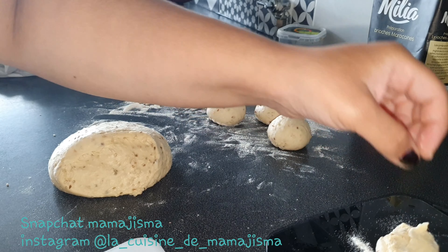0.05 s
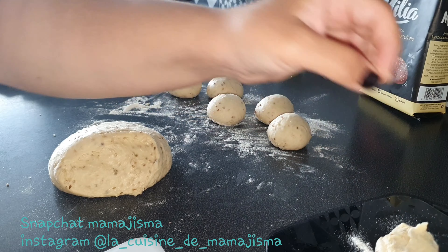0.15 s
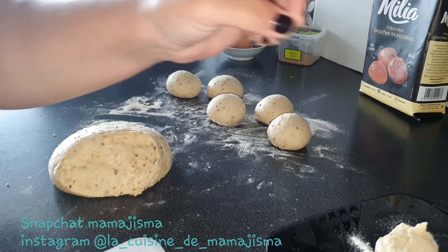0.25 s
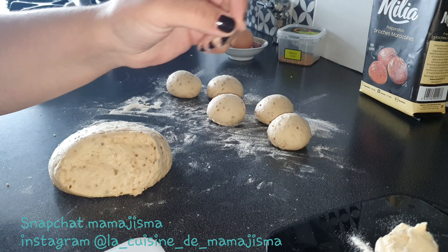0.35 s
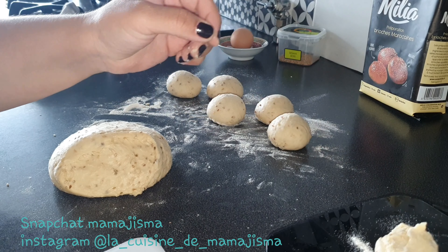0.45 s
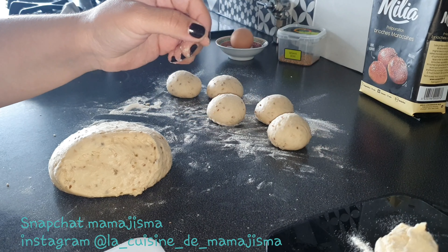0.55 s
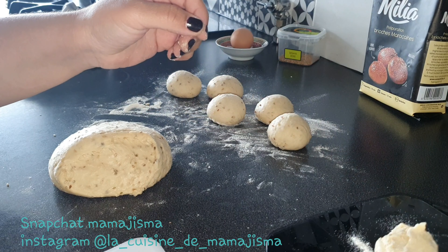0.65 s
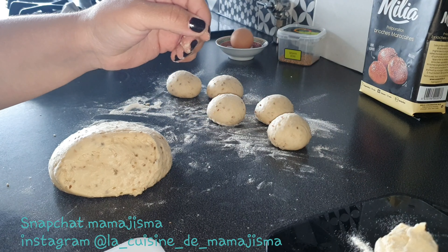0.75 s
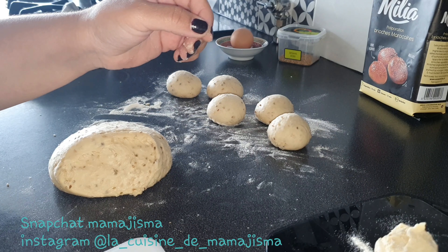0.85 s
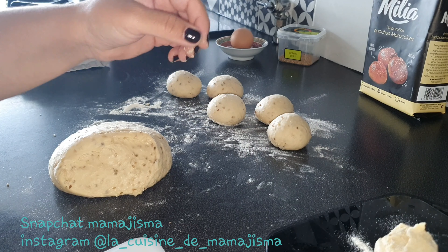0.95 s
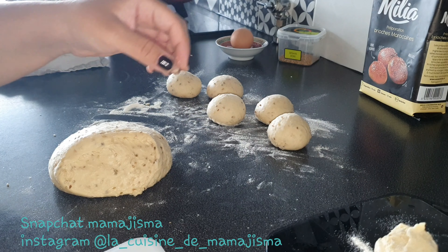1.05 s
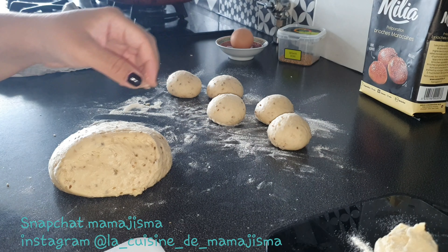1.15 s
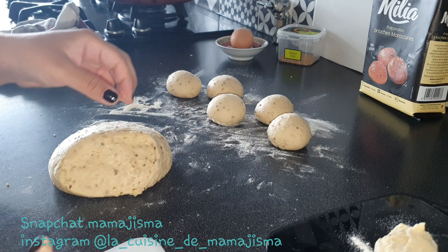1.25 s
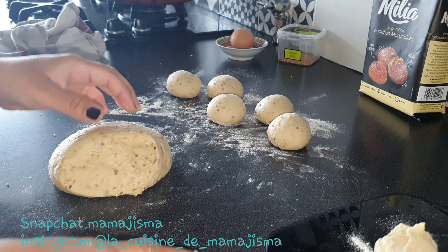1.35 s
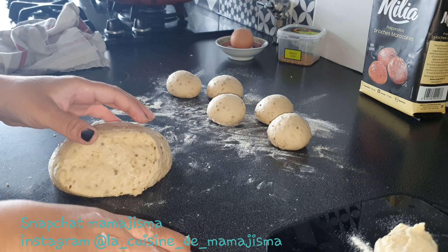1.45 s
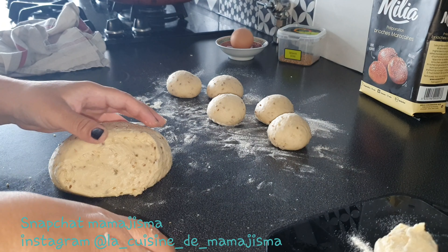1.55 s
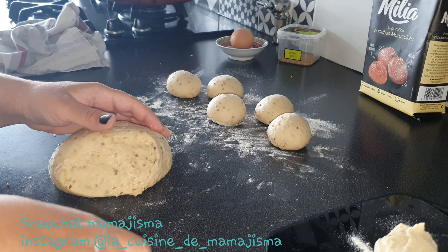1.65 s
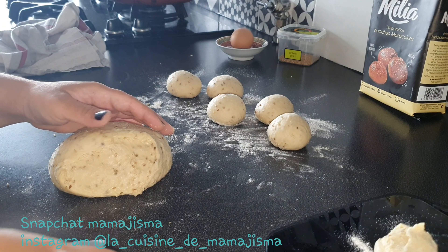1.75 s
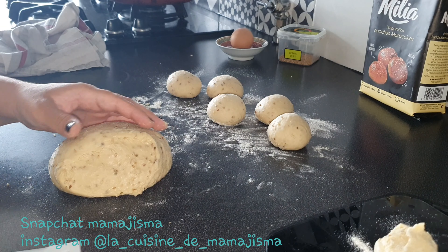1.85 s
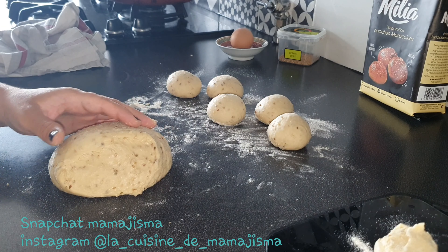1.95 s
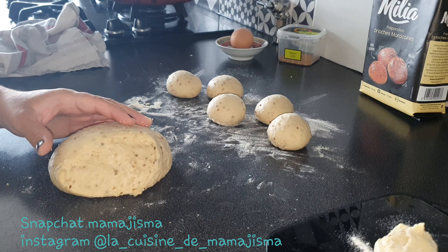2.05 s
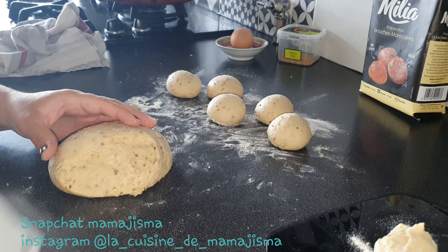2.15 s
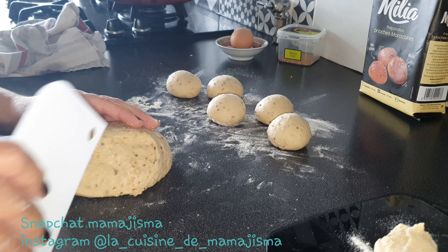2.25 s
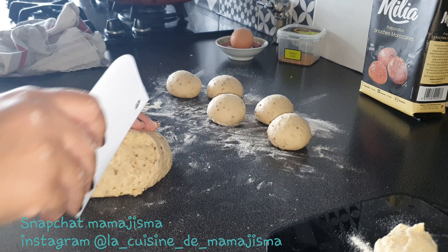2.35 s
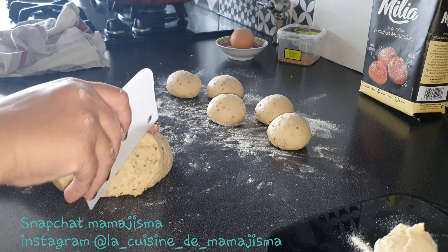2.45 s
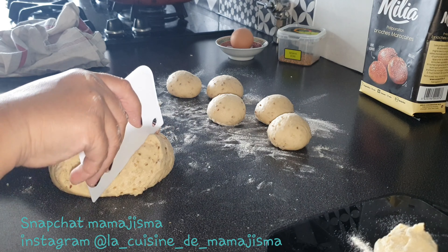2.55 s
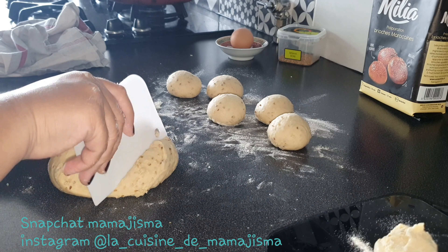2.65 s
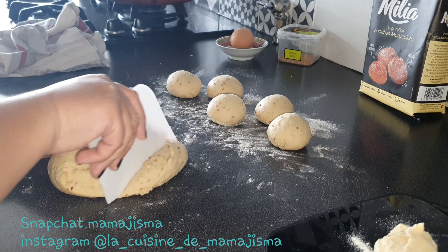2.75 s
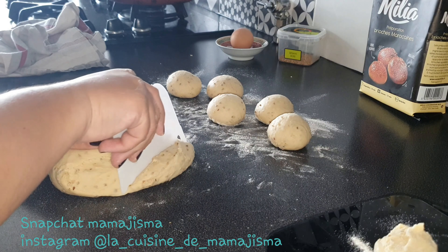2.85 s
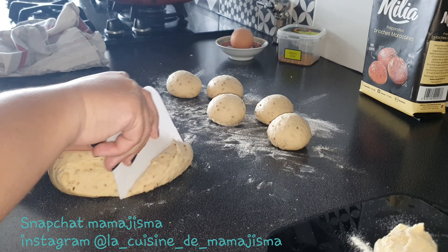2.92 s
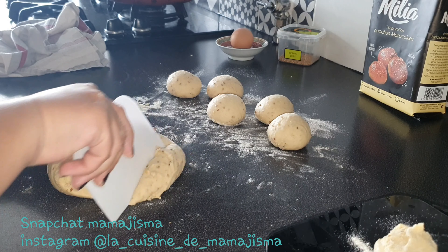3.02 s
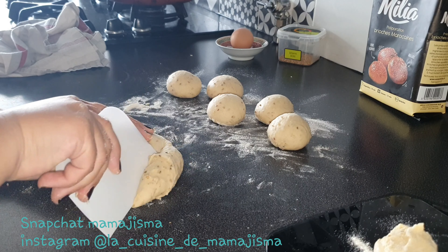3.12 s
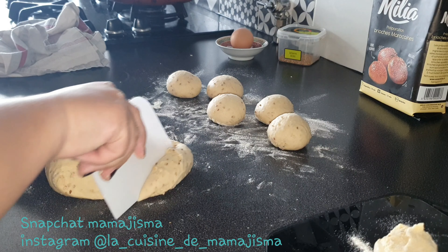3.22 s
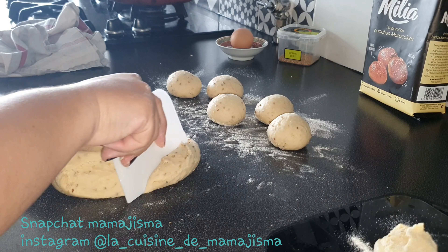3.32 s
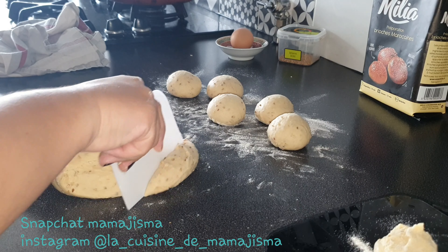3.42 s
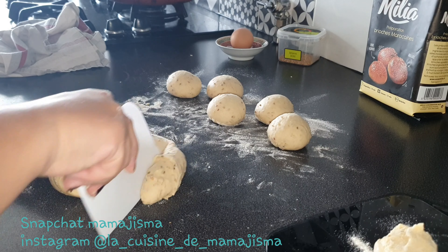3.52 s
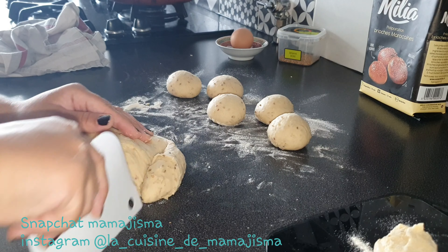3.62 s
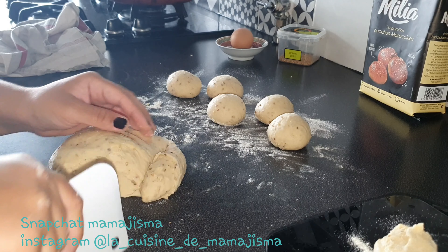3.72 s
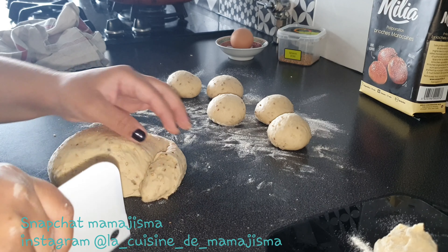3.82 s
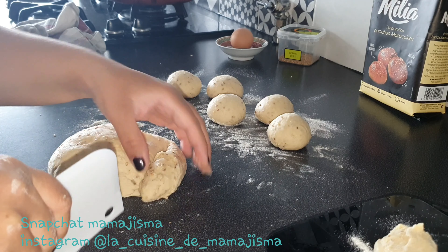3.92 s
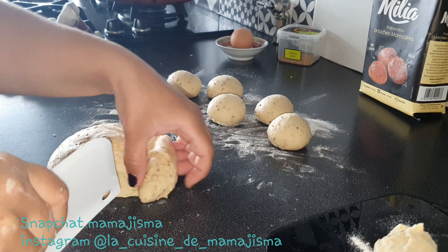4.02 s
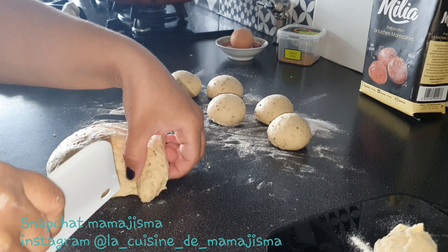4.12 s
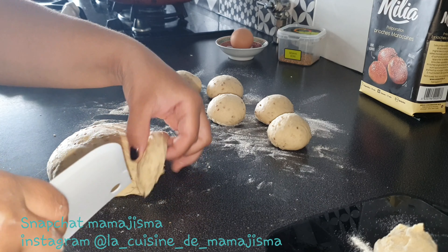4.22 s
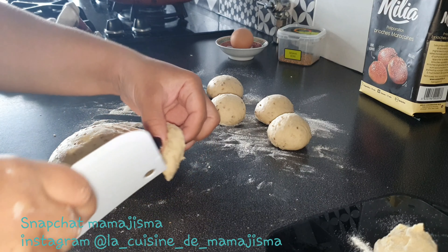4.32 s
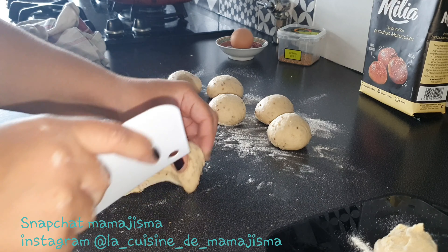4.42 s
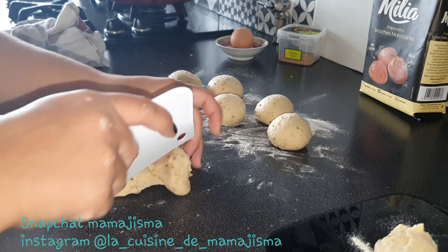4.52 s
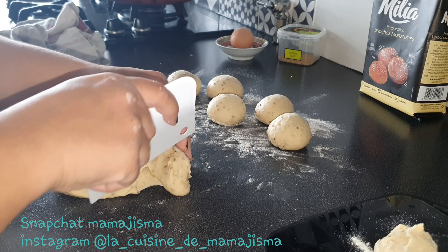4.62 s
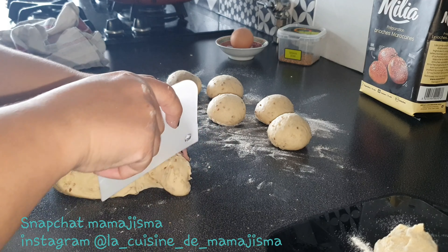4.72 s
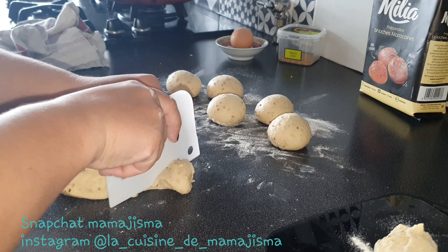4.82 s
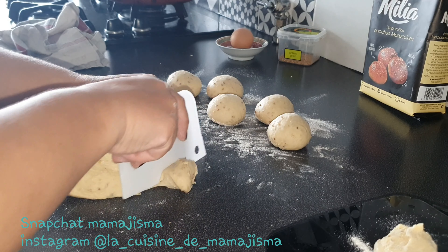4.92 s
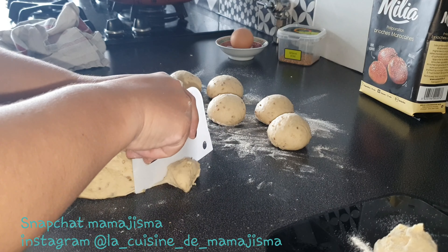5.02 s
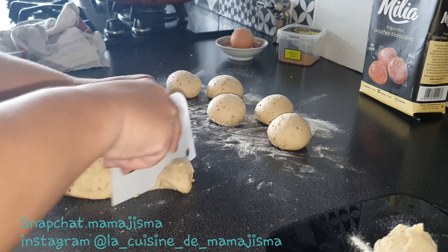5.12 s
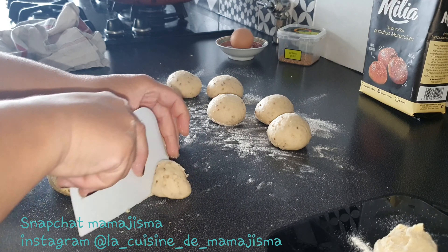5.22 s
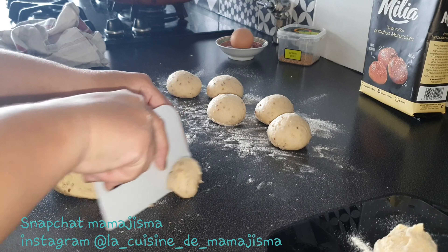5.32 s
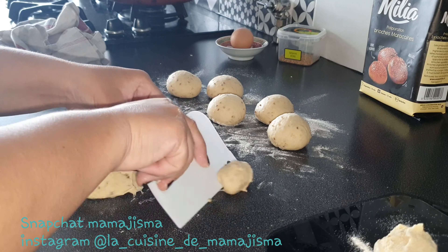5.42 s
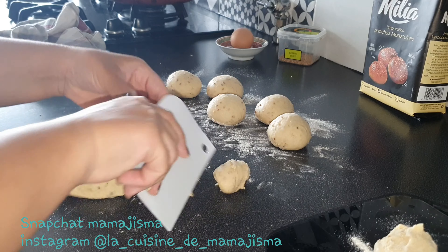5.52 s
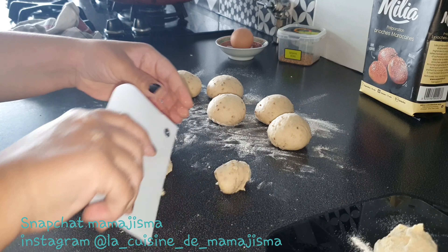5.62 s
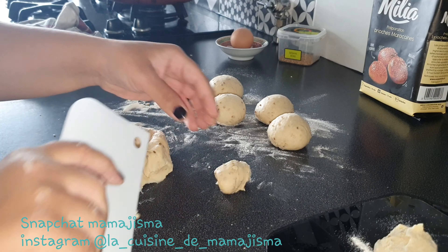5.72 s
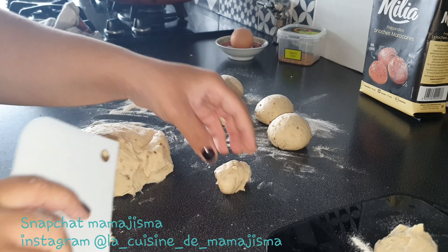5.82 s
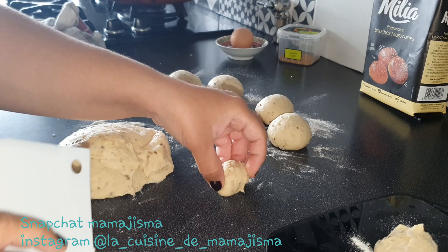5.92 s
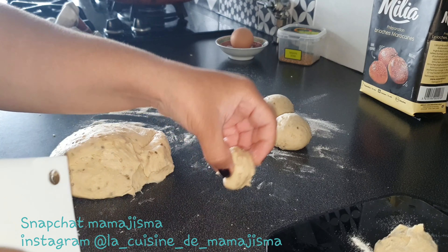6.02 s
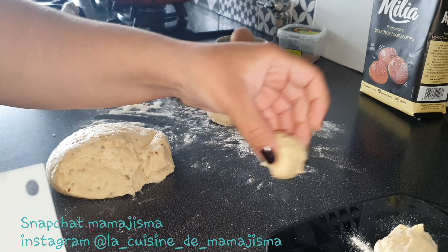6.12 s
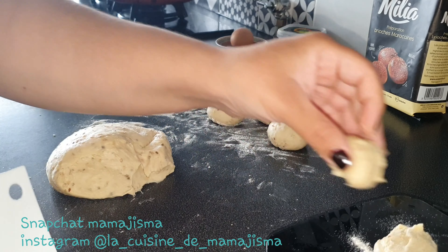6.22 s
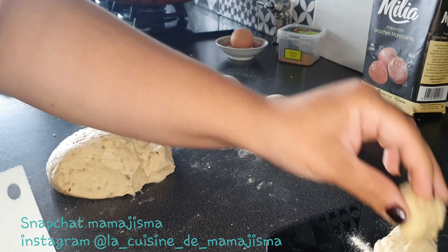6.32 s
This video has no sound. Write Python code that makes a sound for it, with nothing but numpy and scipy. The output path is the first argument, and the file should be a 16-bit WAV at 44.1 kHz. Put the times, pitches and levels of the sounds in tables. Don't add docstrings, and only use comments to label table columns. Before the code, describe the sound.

A close stereo pickup in a small, hard-surfaced kitchen, with action leaning left and a quiet low appliance hum with bassy murmur throughout. From 0 to 1.2 s it is nearly silent: barely audible dry flour hiss between fingertips around 0.25-0.5 s. At 1.35 s a soft dull hand pat, another at 1.47, then a firmer thud with a short gritty rub at 1.68 and a light tick at 1.8. Faint sliding follows near 2.0, with brief bright plastic scuffs at 2.25-2.33. Quiet until 3.1, when the blade drags softly through dough. Ticks gather at 3.6-3.7 into a hollow, sharp clack and scrape at 3.78. A dull, deep thud lands at 4.04, tiny ticks at 4.3. After a lull, a knock at 4.91, then scrapes at 5.19 and 5.26 build to the loudest clack and crisp, bright scrape at 5.42-5.5. Small rubs and ticks fade at 5.65-6.2.

```python
import sys
import numpy as np
from scipy import signal
from scipy.fft import rfft, irfft
from scipy.io import wavfile
from scipy.ndimage import uniform_filter1d, map_coordinates

SR = 44100
rng = np.random.default_rng(int(sys.argv[2]) if len(sys.argv) > 2 else 0)


def natural_amplitude(level_db):
    exponent = np.asarray(level_db, float) / 20
    return 10 ** exponent


def wav_record(signal):
    frames = np.transpose(np.atleast_2d(signal))
    bounded = np.clip(frames, -1, 1)
    quanta = np.round(bounded * 32767).astype(np.int16)
    wavfile.write(sys.argv[1], SR, quanta)


N = 280917
T = np.arange(N) / SR
SWELL = 1.78

# t/s, ring level/dB, edge tick over it/dB, ring f/Hz
CONTACTS = [(0.234, -62, -4, 500), (1.359, -42, -6, 776), (1.466, -53.5, 10, 580), (1.675, -34, 0, 1170),
            (1.807, -48, 4, 463), (2.323, -40, 4, 1040), (3.035, -60, -5, 830), (3.115, -42, -9, 820),
            (3.59, -47, 8, 836), (3.618, -41, 2, 820), (3.688, -29.5, -8, 1080), (3.719, -36, -3, 750),
            (3.784, -19, -14, 757), (3.979, -40, -16, 650), (4.031, -37, -33, 980), (4.287, -54, -3, 950),
            (4.301, -51.5, -2, 690), (4.324, -42.5, -5, 2490), (4.451, -66, -12, 815),
            (4.857, -52, -16, 740), (4.9095, -33, 0.5, 1180), (5.191, -29, -7, 2450),
            (5.2595, -25.5, -5.5, 1570), (5.421, -19, -13, 1220), (5.471, -33, 8, 636),
            (5.49, -31.5, 6, 620), (5.65, -41, 6, 1610), (5.971, -44.5, -3, 890), (6.16, -50, -15, 1080),
            (1.685, -43, -1, 1090), (1.82, -50.5, 5, 900), (3.757, -41.5, 2, 790), (3.819, -33, -21, 825),
            (4.912, -28.5, -25, 1100), (5.016, -56, 3, 1690), (5.133, -53, -5, 690), (5.278, -30, -8, 1410),
            (5.352, -37, -15, 800), (5.401, -36, -5, 1300), (5.427, -25, -10, 1050), (5.451, -39, 0, 1210),
            (5.515, -34, -1, 1010), (5.759, -51, 1, 1100), (5.889, -48, 2, 705), (5.261, -28, -24, 3230),
            (2.242, -41, -7, 2950), (2.262, -43, -3, 1410), (3.3135, -45, 3, 760), (5.414, -27.5, -15, 636)]
# f/Hz, width/Hz, level/dB
SLAB_MODES = [(77.4, 53, 6), (130.7, 16, -1), (225, 30.6, 1), (363.5, 24, -7), (528, 123, -5)]


def sliding(edge_db):
    # f/Hz, width/Hz, level/dB
    edge_modes = [(2860, 680, 5), (3760, 87, -5), (5140, 800, -0.5), (6530, 360, 5.5)]
    # f/Hz, level/dB
    fizz_spectrum = [(4000, -16), (6500, 1), (7500, -4), (9000, -5), (11500, -5), (13500, -6.5),
                     (15000, -10.5), (16000, -19)]
    fizz_lag, sheen_hz, sheen = 0.21, 11200, 0.23
    fizz_db = grip(axis=3) - fizz_lag * (edge_db + 55.5)
    bright_hz = grip(axis=2)
    grit = slips(9000, 2.9, clump_db=1.5)
    coarse = slips(2500, 1.4, clump_db=3.0)
    edge = evened(body(grit, edge_modes)) + 1.72 * evened(resonate(coarse, bright_hz, 2900, order=2))
    fizz = steadied(colour(grit, fizz_spectrum))
    high_pass = signal.butter(2, sheen_hz, "high", fs=SR, output="sos")
    top = signal.sosfiltfilt(high_pass, fizz)
    sheen_gain = natural_amplitude(sheen * (edge_db + 63.5)) - 1
    return natural_amplitude(edge_db) * (steadied(edge) + natural_amplitude(fizz_db) * (fizz + sheen_gain * top))


def pressing(blade_db):
    # f/Hz, width/Hz, level/dB
    blade_modes = [(658, 182, 1.5), (857, 99, -2), (1080, 260, -1), (1387, 126, -1.5), (1620, 210, 1),
                   (2160, 920, 1)]
    base_db, slab_lag = -7, 0.42
    damped = 0.3
    weight_db, bend_hz = grip(axis=4), grip(axis=1)
    slab_db = base_db + weight_db - slab_lag * (blade_db + 62.0)
    drag = slips(1100, 2.34, clump_db=4.5)
    tack = slips(2400, 2.5, clump_db=1.5)
    blade = natural_amplitude(damped * weight_db) * evened(body(drag, blade_modes))
    blade = blade + 0.64 * evened(resonate(tack, bend_hz, 690, order=2))
    slab = natural_amplitude(np.minimum(slab_db, 7.5)) * steadied(body(drag, SLAB_MODES), size=5000)
    return natural_amplitude(1.0 + blade_db) * (steadied(blade) + slab)


def effort(axis):
    # peak t/s, edge scrape level/dB, blade drag level/dB,
    # rise t/s, fall t/s per 20 dB (its sign is ignored)
    handling = [(1.23, -71, -86, 0.09, 2.5), (1.29, -68.5, -72.5, 0.09, 1.9),
                (1.356, -76, -62.5, 0.078, 0.5), (1.51, -64, -63, 0.11, 0.05),
                (1.68, -46.5, -49.5, 0.025, 0.0337), (1.72, -59, -60, 0.024, 0.21),
                (1.81, -53, -63, 0.071, 0.07), (1.85, -60, -63, 0.067, -0.14),
                (1.994, -50.5, -64.5, 0.058, 0.2665), (2.11, -55, -68, 0.17, 0.12),
                (2.18, -55.5, -71, 0.05, 0.2), (2.243, -41, -51, 0.046, 0.0421),
                (2.262, -56, -50, 0.019, 0.0867), (2.33, -41.5, -46.5, 0.027, 0.0157),
                (2.37, -64, -70.5, .04, 0.29), (2.45, -70.5, -74, 0.31, .15), (2.6, -92, -77.5, 0.41, 0.8),
                (2.75, -73, -72, 0.089, 0.16), (2.93, -85, -97, 0.17, .2)]
    first_cut = [(3.052, -61.5, -66, 0.035, 0.54), (3.143, -52, -51.5, 0.14, 0.07),
                 (3.31, -59.5, -54.5, 0.15, 0.08), (3.45, -78, -74.5, 0.16, 2.5),
                 (3.59, -62.5, -61.5, 0.13, 0.07), (3.62, -55.5, -59.5, 0.034, 0.08),
                 (3.69, -51, -49, 0.039, 0.07), (3.722, -45, -44.5, 0.027, 0.123),
                 (3.788, -43, -41.5, 0.026, 0.0757), (3.9, -68.5, -67, 0.22, 0.5),
                 (3.978, -62.5, -51, 0.046, 0.04), (4.049, -64, -54.5, 0.13, 0.06),
                 (4.1, -70, -66.5, 0.12, 0.1), (4.331, -66, -66, 0.084, 0.1), (4.458, -66, -90, 0.04, 0.1),
                 (4.5, -75.5, -88, 0.087, 1), (4.6, -83, -83.5, 0.24, 9.5), (4.78, -78, -87, 0.085, 2)]
    second_cut = [(4.86, -70.5, -72.5, 0.033, 0.6), (4.913, -61.5, -54.5, 0.0033, 0),
                  (4.95, -71, -58, 0.036, 0.25), (5.03, -64.5, -71, 0.24, 0.2),
                  (5.188, -51, -58, 0.078, 0.52), (5.14, -66, -62, 0.045, 0.85),
                  (5.261, -42.5, -43.5, 0.0044, 0.1455), (5.307, -50, -45, 0.094, 0.0851),
                  (5.37, -59, -45.5, 0.034, 0.16), (5.425, -40, -38, 0.09, 0.117),
                  (5.488, -32, -47, 0.16, 0.0655), (5.62, -54, -72, 0.51, 0.1),
                  (5.651, -63, -58.5, 0.017, -0.03), (5.72, -64.5, -87, 0.082, 0.48),
                  (5.771, -57, -60.5, 0.032, 0.24), (5.89, -69, -65.5, 0.14, 0.16),
                  (6.1, -79, -73.5, 0.23, 0.5)]
    return strokes(np.concatenate([handling, first_cut, second_cut])[:, [0, axis, 3, 4]])


def grip(axis):
    holds = [(1.2, 1080, 5000, 0, -17), (1.5, 780, 3600, 1, 4.5), (1.68, 796, 4900, 1.5, 7.5),
             (1.85, 730, 3200, -4.5, 10.5), (2.08, 1340, 3380, -2, 10.5), (2.25, 1450, 2700, -6, -26),
             (2.33, 1350, 4400, -4.5, 0.5), (2.9, 860, 4150, -6.5, -4), (3.1, 844, 3000, -11.5, -6),
             (3.75, 810, 3180, -8.5, 1.5), (4.1, 690, 3580, -10.5, 1.5), (4.45, 1050, 3570, -9, 5),
             (4.65, 770, 4140, 4.5, 1), (4.92, 1160, 2360, -10, 0.5), (5.22, 1420, 3280, -9, 3.5),
             (5.45, 1030, 4500, -4, 2), (5.8, 1390, 2430, -9.5, -7.5), (6.2, 1150, 4270, -2, 2)]
    columns = np.transpose(holds)
    return np.interp(T, columns[0], columns[axis])


def hushed(hush_db=-3.0, before_s=0.0074):
    contact_s = np.sort(np.append(np.transpose(CONTACTS)[0], 99))
    wait_s = contact_s[np.searchsorted(contact_s, T)] - T
    return natural_amplitude(hush_db * np.clip(1 - wait_s / before_s, 0, 1) ** .5)


def singing():
    rubs = [(1.335, -68, 950, 0.081, .04), (1.468, -68, 2920, 0.011, 0.35), (1.808, -51, 3150, .004, 0),
            (1.825, -55, 3340, 0.015, .03), (2.243, -58, 2980, .02, 0.1), (2.26, -52, 1300, .015, 0.05),
            (2.329, -44, 4400, 0.011, -0.0344), (3.725, -53, 3570, 0.0089, 0.22),
            (3.79, -46, 4050, 0.0094, .03), (3.81, -48.5, 858, .012, 0.09), (3.855, -60, 870, 0.011, 0.4),
            (4.93, -54, 2200, .018, .22), (4.93, -55, 920, .015, .2), (5.262, -48, 3200, .004, .03),
            (5.264, -48, 1560, .004, .04), (5.29, -52, 3700, .03, .05), (5.365, -50, 1300, .02, .06),
            (5.425, -42, 700, .025, .03), (5.42, -48, 3000, .03, .05), (5.453, -46, 6300, 0.026, -0.12),
            (5.775, -51.5, 2370, .015, -0.09), (5.78, -63, 1250, 0.021, 0.1),
            (5.77, -63.5, 3770, .012, -0.44), (5.775, -57, 2960, .015, 0.05),
            (5.9, -63.5, 2420, 0.021, 0.18), (5.895, -66, 1340, .015, 0.13), (2.0, -54, 3260, 0.032, -0.05),
            (2.11, -57, 3460, 0.07, -0.17), (3.06, -64, 3100, .03, 0.5), (3.125, -52, 820, .012, 0.16),
            (3.28, -58.5, 890, 0.041, -0.1), (3.312, -55, 780, 0.014, -0.02),
            (4.325, -68, 2450, 0.016, 0.18), (4.36, -65, 3800, 0.019, .03), (4.457, -60, 3560, .018, 0),
            (4.72, -75.5, 904, .03, 0.05), (4.56, -78, 2800, .04, .06), (5.272, -47.5, 3060, 0.0091, -0.2)]
    sharpness = 6.0
    out, t = np.zeros(N), np.arange(16000) / SR
    for s, db, hz, rise, fall in rubs:
        rise, fall = abs(rise), abs(fall)
        jerks = rng.standard_normal(len(t))
        since = t - rise
        decay = natural_amplitude(-20 * np.maximum(since, 0) / fall)
        shape = np.where(since < 0, (t / rise) ** SWELL, decay)
        add(out, s - rise, natural_amplitude(db) * shape * evened(resonate(jerks, hz, hz / sharpness, order=2)))
    return out


def taps():
    ring_s, shortens_by = 0.03, 0.85
    out, t, bright_hz = np.zeros(N), np.arange(3000) / SR, grip(axis=2)
    for s, db, tick_db, hz in CONTACTS:
        a, b = rng.standard_normal((2, len(t)))
        t60, tick_hz = ring_s * (800 / hz) ** shortens_by, bright_hz[round(s * SR)]
        ring = np.sin(2 * np.pi * hz * t) + 0.5 * evened(resonate(a, hz, 470))
        ring = ring * natural_amplitude(-60 * t / t60)
        tick = evened(resonate(resonate(b, tick_hz, 2800), tick_hz, 2800))
        tick = tick * natural_amplitude(tick_db + 4.5 - 60 * t / 0.0094)
        onset = np.minimum(t / 0.00045, 1)
        add(out, s, natural_amplitude(db - 5.0) * (ring + 0.87 * tick) * onset)
    return out


def thuds():
    # t/s, level/dB, knock f/Hz, knock share 0-1, t60/s
    blows = [(1.344, -36, 220, 0.9, 0.2), (1.357, -31, 370, 0.56, 0.45), (1.466, -36, 138, 0.8, 0.34),
             (1.663, -32, 286, 0.02, 0.21), (1.676, -30.5, 224, 0.3, 0.36), (1.801, -37.5, 353, 0.25, 0.14),
             (1.998, -59, 152, 0.7, 0.13), (3.113, -54, 150, 0.2, 0.18), (3.785, -31, 510, 0.64, 0.17),
             (4.037, -25, 353, 0.46, 0.24), (4.048, -28, 155, 0.4, 0.17), (4.298, -46, 155, 1, 0.26),
             (4.903, -37.5, 154, 0, 0.63), (5.416, -26, 518, 1, 0.099), (5.965, -43, 263, 0.06, 0.15)]
    out, t = np.zeros(N), np.arange(8000) / SR
    for s, db, hz, share, t60 in blows:
        push = rng.standard_normal(len(t)) * natural_amplitude(-60 * t / 0.0088)
        boom = body(push, SLAB_MODES)
        knock = np.sin(2 * np.pi * hz * t) * natural_amplitude(-60 * t / .05) * np.minimum(t / .002, 1)
        decay = natural_amplitude(db - 5.5 - 60 * t / max(t60, .03))
        add(out, s, decay * (share * knock + (1 - share) * boom / abs(boom).max()))
    return out


def pinch():
    rubs = [
        (0.246, -84, .05, .4),
        (0.39, -79, .2, .3),
        (0.51, -81, .2, .12),
        (1.13, -84, .1, .1),
    ]
    # f/Hz, level/dB
    hiss_spectrum = [(1500, -35), (2500, -10), (4200, -7), (5600, -2.5), (6800, -1), (8000, -11),
                     (11500, -12), (16000, -23)]
    return natural_amplitude(strokes(rubs)) * evened(colour(slips(12000, 1.5, clump_db=-1.0), hiss_spectrum))


def cabinet():
    modes_hz = [46.0, 81.8]
    shoves = [(0.95, -58.5, -75), (1.5, -57, -63), (1.72, -56.5, -47.5), (3.15, -99, -57),
              (3.76, -58, -57.5), (4.07, -62, -50.5), (4.241, -55, -57), (4.76, -75, -89), (4.94, -62, -62),
              (5.18, -53.5, -79), (5.41, -51, -63), (5.92, -54.5, -55.5)]
    rest_db, rise_s, fall_s = [-69, -70], [0.2, 0.1], [0.16, 0.26]
    out = np.zeros(N)
    for k, hz in enumerate(modes_hz):
        sway_db = strokes([(row[0], row[1 + k], rise_s[k], fall_s[k]) for row in shoves])
        murmur = evened(resonate(rng.standard_normal(N), hz, 2.8))
        out += tone(hz, sway_db, 1.3) + natural_amplitude(rest_db[k]) * murmur
    return out


def appliance():
    # level/dB, left-right/dB
    orders_db = [(-61, -1.5), (-64.5, -5), (-83, -13.5)]
    # f/Hz, level/dB
    whine_lines = [(200, -89), (138, -78)]
    shaft_hz, mains_hz, mains_db = 49.21, 99.93, -68
    late_db, build_s = 7, 2.8
    builds_db = (0, 0, late_db * (np.minimum(T / build_s, 1) - 1))
    out = tone(mains_hz, mains_db, 0.36) + np.zeros((2, 1))
    for order, more_db, (db, pan_db) in zip((1, 2, 8.001), builds_db, orders_db):
        sides = natural_amplitude(np.array([[pan_db], [-pan_db]]) / 2)
        out = out + tone(order * shaft_hz, db + more_db, 0.8) * sides
    return out + sum(tone(hz, db, 2.5) for hz, db in whine_lines)


def kitchen(x, turns=5.5):
    # f/Hz, t60/s
    decay_times = [(100, 0.27), (500, 0.21), (2000, 0.14), (6000, 0.15), (15000, 0.062)]
    count = SR // 3
    echoes = np.zeros((3, 2, count))
    at = np.arange(40, count - 20, 20) + rng.integers(0, 20, (3, 2, (count - 41) // 20))
    np.put_along_axis(echoes, at, rng.choice([-1., 1.], at.shape), 2)
    hz, t, z = signal.stft(echoes, SR, nperseg=256)
    decay = natural_amplitude(-60 * t / read(decay_times, hz)[:, None])
    tail = signal.istft(z * decay, SR, nperseg=256)[1]
    low_pass = signal.butter(2, 420, fs=SR, output="sos")
    tail[:, 1] += signal.sosfiltfilt(low_pass, tail[:, 0] - tail[:, 1])
    tail = tail / np.linalg.norm(tail[0, 0])
    share = np.sqrt(2 / 3) * np.cos(np.pi * (turns * T + np.arange(3)[:, None] / 3))
    return signal.fftconvolve((x * share)[:, None], tail, axes=2).sum(0)[:, :N]


def air():
    # f/Hz, left-right likeness -1 to 1
    likeness = [(60, 1), (240, 0.23), (950, -0.21), (3770, 0.16), (15000, -0.34)]
    # f/Hz, level/dB per Hz
    spectrum = [(20, -39.5), (60, -12), (140, -19), (175, -28), (330, -32), (480, -42), (6000, -53),
                (16000, -57)]
    hz = np.fft.rfftfreq(N, 1 / SR)
    a, b = rfft(rng.standard_normal((2, N)))
    same = np.clip(read(likeness, hz), -1, 1)
    z = np.array([a, same * a + np.sqrt(1 - same ** 2) * b]) * natural_amplitude(read(spectrum, hz))
    above_bass = np.std(irfft(z * (hz > 150), N))
    return natural_amplitude(-75) * irfft(z, N) / above_bass


def slips(per_s, spread_db, clump_db):
    size = natural_amplitude(spread_db * np.minimum(rng.exponential(1, N), 3.7) + clump_db * drift(63))
    return size * rng.choice([-1., 1.], N) * (rng.random(N) < per_s / SR)


def strokes(rows):
    s, db, rise, fall = np.transpose(rows)[:, :, None]
    coarse_t = T[::32]
    since = coarse_t - s
    swell = np.clip(1 + since / abs(rise), 0, 1) ** SWELL
    decay = natural_amplitude(-20 * np.maximum(since, 0) / abs(fall))
    shape = np.where(since < 0, swell, decay)
    power = ((natural_amplitude(db) * shape) ** 2).sum(0)
    return np.interp(T, coarse_t, 10 * np.log10(power + 1e-14))


def resonate(x, hz, width, order=1):
    turn = np.exp(2j * np.pi * np.cumsum(hz * np.ones(len(x))) / SR)
    r = np.exp(-np.pi * abs(width) / SR)
    return 2 * (turn * signal.sosfilt([[1 - r, 0, 0, 1, -r, 0]] * order, x * turn.conj())).real


def body(x, modes):
    out = 0
    for k, (hz, width, db) in enumerate(modes):
        mode = resonate(x, hz, 1.58 * width, order=2) / np.sqrt(width)
        out = out + (-1) ** k * natural_amplitude(db) * mode
    return out


def tone(hz, db, waver_db):
    in_step_s = .5
    return np.sqrt(2) * natural_amplitude(db + waver_db * drift(2.6)) * np.cos(2 * np.pi * hz * (T - in_step_s))


def drift(per_s):
    low_pass = signal.butter(2, per_s, fs=SR, output="sos")
    return evened(signal.sosfilt(low_pass, rng.standard_normal(N + SR))[SR:])


def colour(x, spectrum):
    return irfft(rfft(x) * natural_amplitude(read(spectrum, np.fft.rfftfreq(len(x), 1 / SR))), len(x))


def read(points, hz):
    f, value = np.transpose(points)
    return np.interp(np.log(hz + 1), np.log(f + 1), value)


def evened(x):
    return x / np.sqrt(np.mean(x ** 2) + 1e-20)


def steadied(x, size=4000):
    return x / np.sqrt(uniform_filter1d(x ** 2, size) + 1e-20)


def add(mix, s, sound):
    part = mix[round(s * SR):][:len(sound)]
    part += sound[:len(part)]


def scene():
    # t/s, delay to the right port/ms, left-right/dB (10 is even)
    hands = [(1.2, 0.32, 17), (1.75, 0.27, 7.5), (2.25, 0.23, 12), (2.75, 0.35, 10), (3.25, 0.18, 8),
             (3.75, 0.19, 7), (4.25, 0.2, 10), (4.75, -0.128, 13.5), (5.25, 0.11, 4.5), (5.75, 0.1, 10),
             (6.2, 0.2, 12)]
    hush, edge_db = hushed(), effort(axis=1)
    friction = hush * (pressing(effort(axis=2)) + sliding(edge_db))
    near = friction + taps() + thuds() + pinch() + singing()
    wide = natural_amplitude(-2.5) * hush * sliding(edge_db)
    s, lag_ms, pan_db = np.transpose(hands)
    late_at = np.arange(N) - np.interp(T, s, lag_ms) * SR / 1000
    late = map_coordinates(near, [late_at], order=1)
    side = natural_amplitude(np.interp(T, s, pan_db) / 2 - 5.0)
    direct = np.array([near * side + wide, late / side])
    return direct + natural_amplitude(-3.5) * kitchen(near) + appliance() + cabinet() + air()


def top_cut(x):
    return signal.sosfilt(signal.butter(12, 15560, fs=SR, output="sos"), x)


def record(dry):
    low_pass = signal.firwin(401, 15560, window=("kaiser", 9), fs=SR)
    mix = signal.oaconvolve(dry, low_pass[None], "same")
    return top_cut(mix)


dry = scene()
out = record(dry)
wav_record(out)
```